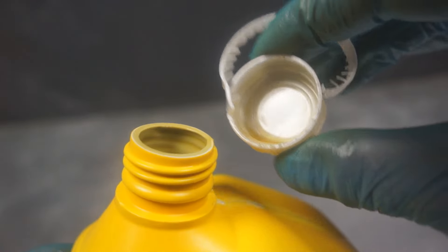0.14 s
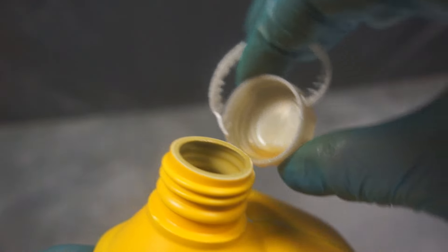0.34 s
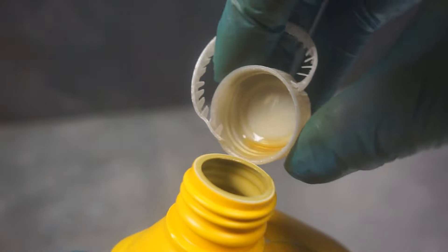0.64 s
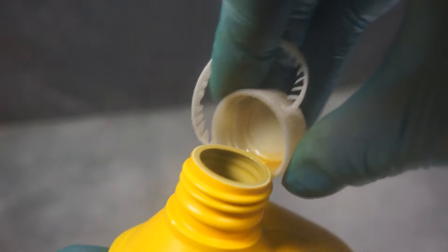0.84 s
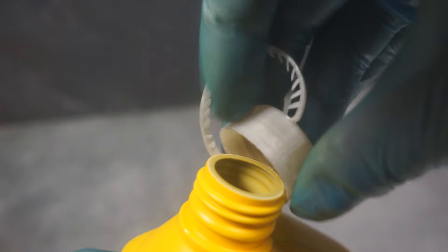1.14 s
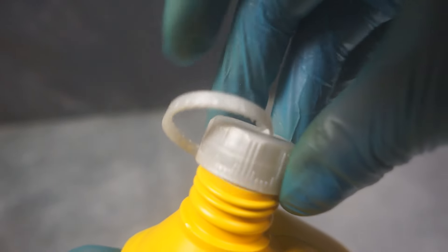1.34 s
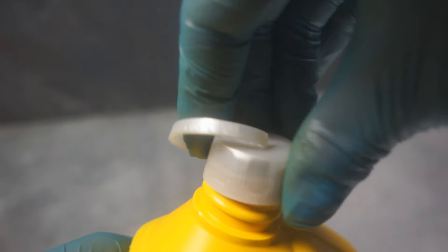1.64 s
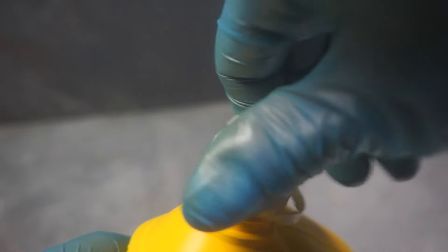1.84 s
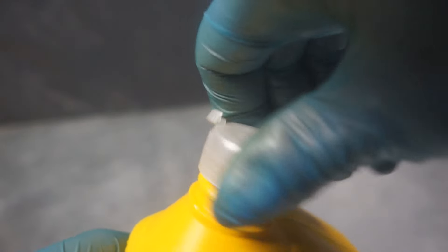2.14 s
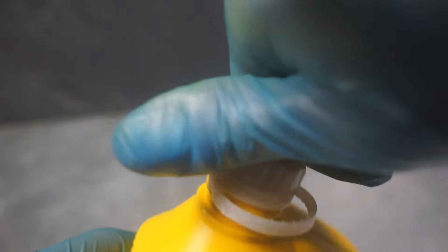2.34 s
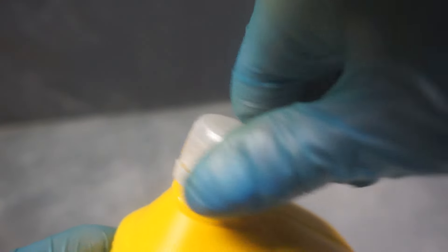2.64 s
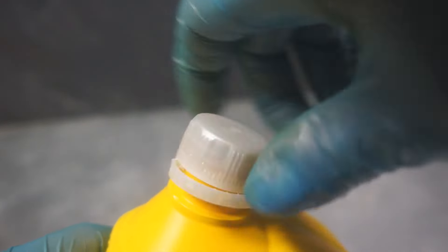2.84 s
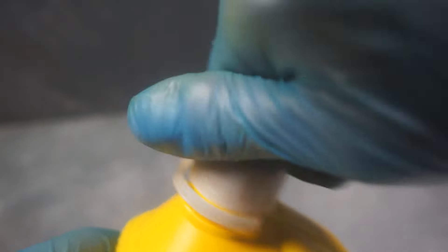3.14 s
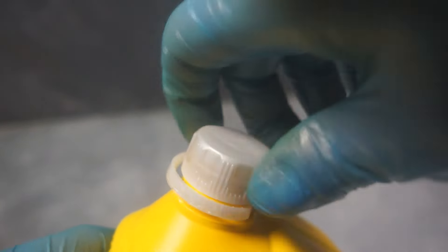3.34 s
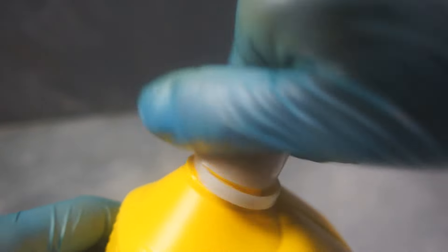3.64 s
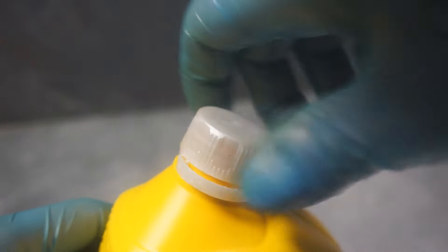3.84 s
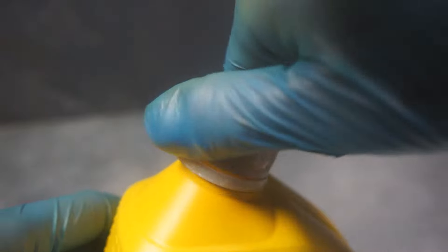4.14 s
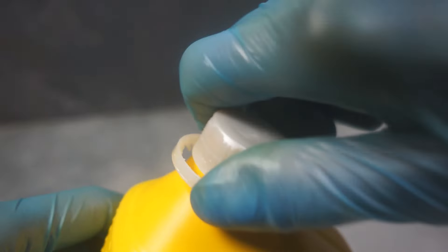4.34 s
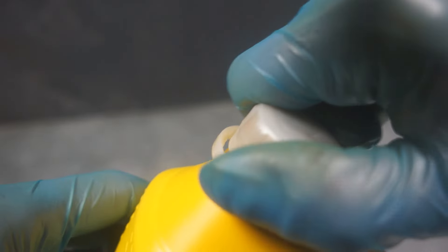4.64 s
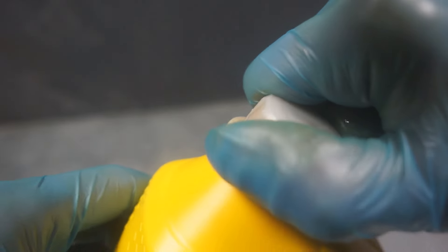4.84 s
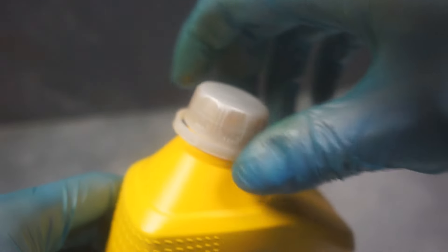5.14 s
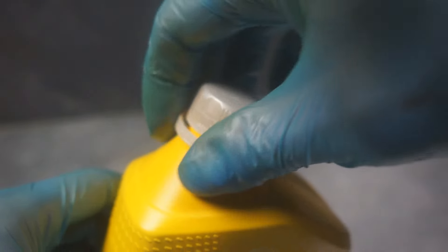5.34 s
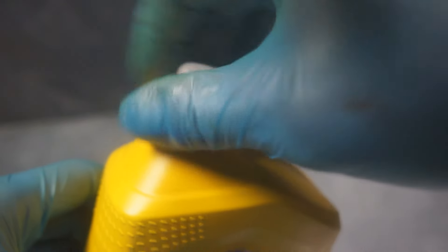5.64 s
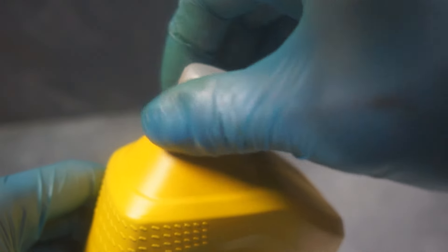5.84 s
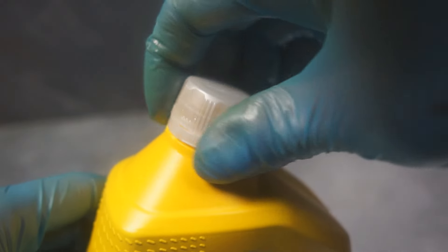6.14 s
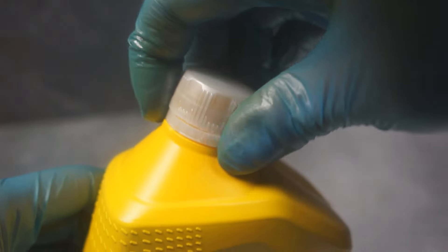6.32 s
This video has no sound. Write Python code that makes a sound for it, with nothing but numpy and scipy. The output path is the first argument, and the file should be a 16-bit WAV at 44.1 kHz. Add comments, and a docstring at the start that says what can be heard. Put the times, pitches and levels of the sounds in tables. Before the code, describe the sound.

Close, dry plastic knocks and crackling snaps as a cap is screwed onto a hollow bottle, with rubbery glove rubbing in a quiet humming room.

```python
"""A plastic screw cap knocks and snaps on a bottle neck as gloved hands twist it shut, close to two microphone ports.
Knocks: short noise blows ring decaying modes of cap, bottle and bright snap. Scrapes: stick-slip noise swells
in strokes of gloves and thread, over a lasting rub of the grip. Hands: filtered for each port, with short reflections.
Behind them: shaped room noise, a machine's faint hum of narrow noise lines and an early whir of gliding noise bands."""
import sys
import numpy as np
from scipy import signal
from scipy.fft import rfft, irfft
from scipy.io import wavfile
from scipy.ndimage import uniform_filter1d

SR = 44100
rng = np.random.default_rng(int(sys.argv[2]) if len(sys.argv) > 2 else 0)


def voltage_ratio(decibels):
    """Convert decibels (scalar or array-like) to amplitude ratios, 20 dB per decade."""
    exponent = np.asarray(decibels, float) / 20
    return 10 ** exponent


def master_out(mix):
    """Clip the mix to full scale and print it as 16-bit PCM to the path in sys.argv[1]."""
    frames = np.transpose(np.atleast_2d(mix))
    ceiling = np.clip(frames, -1, 1)
    pcm = np.round(ceiling * 32767).astype(np.int16)
    wavfile.write(sys.argv[1], SR, pcm)


N = 285768

# knocks and snaps: (time [s], cap peak [dB], bottle re cap [dB], snap re cap [dB], bottle wall tone [Hz])
KNOCKS = [(0.3747, -28.5, -8.5, -5, 2200), (0.3983, -42, 10, -21, 1050), (0.4055, -24, -21, -11, 510),
          (0.4529, -8.5, 0.5, -43, 1340), (0.549, -33, -2, -23, 1310), (0.5777, -10.5, -1.5, -34, 1364),
          (0.655, -47, 8.5, 5, 1150), (0.7627, -29, 3, -4, 1230), (0.8589, -13, 4, -22, 1210),
          (0.8947, -22.5, 6, -9, 1160), (0.8994, -17.5, 3.5, -12.5, 1160), (1.065, -41.5, 9, -16, 1220),
          (1.1049, -20, -6, 5, 1380), (1.222, -21.5, -36, 5.5, 1020), (1.2264, -2.5, -38, -5, 2000),
          (1.2299, -13.5, -24.5, 2.5, 1100), (1.2339, -18, -25, -24, 1220), (1.4697, -37, 8, 15, 477),
          (1.642, -25.5, -0.5, -4.5, 740), (1.7485, -26.5, -2, 2, 735), (1.7844, -18.5, -16, -10, 880),
          (1.793, -23, -7.5, -13, 1650), (1.8074, -19, 0.5, -24, 1110), (1.8458, -34, 4.5, 4, 740),
          (1.988, -49, 10, -10, 740), (2.174, -12, -8, -2.5, 837), (2.1999, -31, -11, -11, 783),
          (2.2223, -21, -16.5, 4, 1140), (2.2272, -4, -8.5, -0.5, 1780), (2.2299, -10.5, -3, -1, 2400),
          (2.2478, -17, -11.5, 2, 2200), (2.2886, -33, 4.5, 5, 1180), (2.511, -39, -1, 0, 1090),
          (2.5363, -32.5, -6, 9.5, 1850), (2.5676, -26, -7, -7, 1180), (2.5855, -30.5, -23, -24, 1460),
          (2.6967, -27, -28, 0, 810), (2.7736, -30.5, -2, -9, 2040), (2.814, -41, -17, 5, 865),
          (2.9662, -31, -9, 0, 660), (3.0704, -33, -25, 7, 786), (3.0991, -22, 1, -25, 850),
          (3.1308, -11, -7, -1.5, 1750), (3.189, -43, 11, -8, 724), (3.489, -24.5, -8, -9, 780),
          (3.7254, -21.5, 6, 4.5, 790), (4.0811, -26.5, -13, 5, 774), (4.1045, -23.5, -14.5, -17, 1110),
          (4.1859, -48, -6, 14, 633), (4.6459, -30, -4.5, 8.5, 1120), (4.6977, -42.5, 6.5, 8, 615),
          (4.788, -26.5, -9, -7, 296), (4.8279, -29, -7.5, -11, 1250), (4.8631, -40, 2.5, 7, 292),
          (4.9723, -35, -10.5, -20, 293), (5.022, -24.5, -19.5, -7, 630), (5.0797, -20.5, -7.5, -1, 1830),
          (5.092, -27.5, 1, -9, 1090), (5.1053, -26.5, -4.5, -3, 905), (5.1357, -23.5, -10.5, -20, 1050),
          (5.3787, -30, -22, -1, 676), (5.4995, -32, -33, -6, 657), (5.7094, -29.5, -19, 1, 528),
          (5.735, -34, -4, -17, 900), (5.7717, -5.5, -16, -7.5, 1130), (6.0777, -29, -9, -13, 310),
          (6.1508, -10.5, -8, 3.5, 1400), (6.2855, -6.5, -7, 3.5, 1090), (6.4422, -19, -8, -5, 1320),
          (6.4465, -16.5, -2, -9, 1920)]


def evened(x):
    """Scales a sound to rms 1."""
    return x / np.sqrt(np.mean(x ** 2) + 1e-20)


def read(points, hz):
    """Reads a table on a log-frequency axis."""
    f, value = np.transpose(points)
    return np.interp(np.log(hz + 1), np.log(f + 1), value)


def resonate(x, hz, width):
    """Shifts the curve hz to zero, smooths twice and shifts back: a steep resonance."""
    turn = np.exp(2j * np.pi * np.cumsum(hz * np.ones(len(x))) / SR)
    r = np.exp(-np.pi * width / SR)
    smooth = signal.lfilter([(1 - r) ** 2], [1, -2 * r, r * r], x / turn)
    return 2 * (turn * smooth).real


def room():
    """Steady air noise, only partly alike at the two ports."""
    # spectrum: (frequency [Hz], relative density [dB per Hz])
    colour = [(15, -48), (25, -38), (117, -6), (212, -8), (293, -1.5), (416, -8.5), (641, 4.5), (775, -3.5),
              (2610, -14.5), (4740, -15.5), (11000, -23.5), (14400, -20), (16000, -31)]
    # likeness of the ports: (frequency [Hz], correlation [-1..1])
    likeness = [(60, 0.71), (240, 0.22), (950, 0.31), (3770, 0.24), (15000, 0.11)]
    # balance: (frequency [Hz], left re right [dB])
    balance = [(60, -10), (180, -9.5), (550, 1), (1650, -2.5), (4970, 1), (15000, -13.5)]
    frames, hz = N // 512 + 5, np.fft.rfftfreq(2048, 1 / SR)
    a, b, c, d = rng.standard_normal((frames, 1025, 4)).T
    same = np.clip(read(likeness, hz), -1, 1)[:, None]
    left = a + 1j * b
    right = same * left + np.sqrt(1 - same ** 2) * (c + 1j * d)
    tilt_db = np.outer([.5, -.5], read(balance, hz))
    z = np.array([left, right]) * voltage_ratio(read(colour, hz) + tilt_db)[:, :, None]
    noise = signal.istft(z, nperseg=2048, noverlap=1536)[1][:, :N]
    return voltage_ratio(-56.5) * evened(noise)  # rms over both ports


def hum():
    """Wavering narrow lines of a distant machine, resonated from noise that is unlike at the two ports."""
    # fuzzy lines: (frequency [Hz], level before the swell [dB], width of one smoothing [Hz])
    hum_lines = [(266, -68, 16), (284.7, -62, 26), (313.1, -62, 2.64), (484, -68.5, 15), (579, -71, 7.2),
                 (593, -70, 9.9), (627, -66.5, 21), (686, -69.5, 8.4)]
    # swell of the whole hum: (time [s], gain [dB])
    hum_swell = [(0, -25), (.25, -3), (.4, 0.5), (2, -6), (4, -0.5), (5, 1), (6.1, 0.5), (6.48, -11)]
    noise = rng.standard_normal((2, N))
    ports = [sum(voltage_ratio(db) * evened(resonate(n, hz, w)) for hz, db, w in hum_lines) for n in noise]
    return np.array(ports) * voltage_ratio(np.interp(np.arange(N) / SR, *np.transpose(hum_swell)))


def whir():
    """Noise in two narrow bands whose tones glide and step, stronger on the right."""
    # two strands: (time [s], frequency [Hz], level before panning [dB])
    strands = [
        [(0, 620, -54.5), (.14, 634, -55), (.17, 750, -56), (.24, 745, -61), (.265, 843, -58), (.35, 877, -56),
         (.38, 870, -71)],
        [(0, 1227, -67), (.17, 1258, -65), (.19, 960, -60), (.24, 983, -55), (.3, 970, -54), (.34, 970, -59),
         (.38, 960, -75)],
    ]
    t, out = np.arange(N) / SR, np.zeros(N)
    for s, hz, db in np.transpose(strands, (0, 2, 1)):
        tone = evened(resonate(rng.standard_normal(N), np.interp(t, s, hz), 64))
        out += tone * voltage_ratio(np.interp(t, s, db)) * (t < s[-1])
    return out * voltage_ratio([[-1.5], [1.5]])


def near(x):
    """Two close ports hear the hands with their own balance and phase, plus short reflections."""
    # balance: (frequency [Hz], left re right [dB])
    port_balance = [(300, -1), (1000, -1.5), (2400, 3.5), (5000, 3), (9000, 2), (14000, -4.5)]
    # phase: (frequency [Hz], lead of the left port [rad])
    port_lead = [(300, 0.24), (600, 0.2), (2150, 0.22), (2760, 0.7), (9000, -0.47), (11700, -0.49)]
    x = signal.sosfilt(signal.butter(4, 220, "highpass", fs=SR, output="sos"), x)  # small things give no bass
    hz = np.fft.rfftfreq(N, 1 / SR)
    tilt = voltage_ratio(read(port_balance, hz) / 2) * np.exp(.5j * read(port_lead, hz))
    direct = irfft(rfft(x) * np.array([tilt, 1 / tilt]), N)
    t = np.arange(8000) / SR
    tail = rng.standard_normal((2, len(t))) * voltage_ratio(-60 * t / 0.027) * (t > .002)  # t60 27 ms, from 2 ms on
    tail /= np.linalg.norm(tail[0])
    return direct + voltage_ratio(-10.5) * signal.fftconvolve(x[None], tail, axes=1)[:, :N]


def rubbing():
    """Friction noise: stick-slip grains and sparse thread ticks on hiss, in uneven clumps; rms 1."""
    slips_per_s, ticks_per_s, tick_db = 700, 74, 18
    slips = voltage_ratio(1.8 * np.minimum(rng.exponential(1, N), 5)) * (rng.random(N) < slips_per_s / SR)
    rub = rng.standard_normal(N) * (1 + 2.3 * uniform_filter1d(slips, size=6))
    clumps = evened(uniform_filter1d(uniform_filter1d(rng.standard_normal(N), 250), 250))
    rub = rub + voltage_ratio(tick_db) * rng.standard_normal(N) * (rng.random(N) < ticks_per_s / SR)
    return evened(rub * voltage_ratio(1.4 * clumps))


def stroke_rows():
    """Scraping strokes, plus a rattle for every knock, which shakes cap and ring for a moment."""
    # strokes: (time of the height [s], build-up [ms], cap [dB], bottle re cap [dB], glove hiss re cap [dB])
    stroke_table = [(0.545, 90, -54.5, 1.5, -5), (1.005, 110, -57.5, 2, -15), (1.095, 57, -51.5, -15, -5.5),
                    (1.168, 38, -50.5, -11, -2), (1.192, 26.3, -41, -7.5, 5), (1.258, 57, -39, -20, -3),
                    (1.3, 45, -50, -12, -8), (1.425, 38, -52.5, -4.5, 5), (1.477, 53, -45, -10.5, 1),
                    (1.639, 34, -54, 7.5, -4), (1.76, 54, -45.5, -11, -1.5), (1.796, 10.2, -30, -1, -5.5),
                    (1.836, 39, -44.5, -1.5, 0), (2.045, 36, -50, 1.5, -1), (2.301, 113, -50.5, 1, 0),
                    (2.59, 160, -63, 3.5, -18), (2.718, 73, -44.5, -5.5, -4.5), (2.816, 12, -51, -4, 11.5),
                    (2.848, 34, -45, -4, 1.5), (3.07, 52, -49.5, -25, -6), (3.153, 110, -45.5, 1.5, -0.5),
                    (3.32, 67, -57, 1, 6), (3.416, 17, -52, -3, -1.5), (3.501, 11.5, -39, 1, -2),
                    (3.53, 35, -46, -2.5, -3), (3.653, 113, -48.5, -3.5, 1.5), (3.83, 150, -54, 0.5, 5),
                    (4.124, 53, -40.5, -1.5, -1.5), (4.276, 49, -43.5, -9.5, 0), (4.351, 18, -57, 1, 4.5),
                    (5.06, 77, -46, -7, -3), (5.108, 62, -42, -8, 0.5), (5.305, 47, -56, -1.5, -2.5),
                    (5.417, 49, -49, -3, -0.5), (5.504, 55, -46, -10, -3), (5.659, 38, -53, -5, 0),
                    (5.714, 23, -45.5, -26, 0), (5.802, 68, -43.5, -4, -2), (5.905, 89, -49.5, -5.5, 2),
                    (5.989, 52, -51.5, -6.5, -3.5), (6.14, 66, -49.5, -9, -3.5), (6.437, 34, -46.5, -9, 1)]
    stop_share = 0.43  # a stroke stops in this share of its build-up time
    rise_ms, fall_ms, rattle_db = 8.4, 28.6, -38.5  # rattle, level re its knock
    rows = [(s, ms, stop_share * ms, *levels) for s, ms, *levels in stroke_table]
    for s, db, bottle_db, snap_db, _ in KNOCKS:
        # the rattle takes on a little of its knock's colour
        rows.append((s, rise_ms, fall_ms, db + rattle_db, -1 + 0.13 * bottle_db, -2 + 0.13 * snap_db))
    return rows


def strokes():
    """Rubbing coloured by cap and bottle swells as the hand speeds up and stops, over the resting grip."""
    # colour, with the cap's hollow near 4.8 and 10 kHz: (frequency [Hz], relative density [dB per Hz])
    scrape_colour = [(220, -12), (350, -11), (650, -9), (1150, -7), (2400, -13.5), (3400, -7), (4200, -5.5),
                     (4900, -4), (5800, -6.5), (7600, -8.5), (10200, -10.5), (12000, -13), (14200, -23.5),
                     (15800, -35.5), (16600, -55)]
    # gloves resting and shifting on the plastic: (time [s], cap level [dB])
    grip = [(0, -75), (.4, -67), (.8, -68), (.93, -63), (1.35, -65), (1.9, -61.5), (2.12, -74), (2.39, -64),
            (2.5, -56), (2.96, -59.5), (3.8, -70), (3.925, -63), (3.98, -50.5), (4.07, -52.5), (4.4, -60.5),
            (4.6, -56.5), (4.9, -66.5), (5.2, -64), (5.36, -65), (5.58, -55), (6.04, -66), (6.24, -52.5),
            (6.37, -60.5)]
    hz, _, z = signal.stft(rubbing(), SR, nperseg=256)
    patches = evened(uniform_filter1d(uniform_filter1d(rng.standard_normal(z.shape), 5, 0), 40, 1))
    z *= voltage_ratio(read(scrape_colour, hz)[:, None] + 2.2 * patches)
    s, rise_ms, fall_ms, cap_db, bottle_db, hiss_db = np.transpose(stroke_rows())[:, :, None]
    t = np.arange(0, N, 32) / SR
    late_ms = 1000 * (t - s)
    flank_ms = np.where(late_ms < 0, rise_ms, fall_ms)
    swell = np.exp(-abs(late_ms / flank_ms) ** 2.55)
    grip_db, out = np.interp(t, *np.transpose(grip)), np.zeros(N)
    # cap, bottle, hiss: (stroke re cap [dB], grip re cap [dB], lowest and highest frequency [Hz])
    parts = [(0, 0, 3000, 6500), (bottle_db, -4.5, 0, 3000), (hiss_db, -1, 6500, SR)]
    for db, rest_db, low, high in parts:
        part = signal.istft(z * ((hz >= low) & (hz < high))[:, None], SR, nperseg=256)[1][:N]
        moving = np.linalg.norm(swell * voltage_ratio(cap_db + db), axis=0)
        level = np.hypot(moving, voltage_ratio(grip_db + rest_db))
        out += evened(part) * np.interp(np.arange(N) / SR, t, level)
    return out


def gripped(modes, hz, db, t60, slope_db):
    """The grip leaves one tone free; modes lose slope_db per octave away from it."""
    damped = [(f, level - slope_db * abs(np.log2(f / hz)), ring_s) for f, level, ring_s in modes]
    return [(hz, db, t60)] + damped


def ring(modes, blow, chance, band_hz):
    """A short blow through dying modes within a band; where it lands sets each mode's share. Peak 1."""
    t = np.arange(3000) / SR
    sound = np.zeros(len(t))
    for (hz, db, t60), (share, detune) in zip(modes, chance):
        sound += voltage_ratio(db + 3.5 * share - 60 * t / t60) * np.sin(2 * np.pi * hz * (1 + .03 * detune) * t)
    band = signal.butter(4, band_hz, "bandpass", fs=SR, output="sos")
    sound = signal.sosfilt(band, signal.fftconvolve(sound, blow)[:len(t)])
    return sound / abs(sound).max()


def clicks():
    """Each knock rings the cap, its air hollow, the bottle wall and a bright snap."""
    # ringing of the plastic, before grip and chance: (frequency [Hz], relative level [dB], t60 [s])
    bottle_modes = [(760, -14, 0.096), (1310, 3, 0.017), (1750, 8.5, 0.0097), (2040, 5.5, 0.018),
                    (2490, 1, 0.017), (2800, -24, 0.0032)]
    cap_modes = [(3450, -8, .007), (4000, -7, .008), (4400, -5, .01), (4800, -4, .008), (5250, -4, .007),
                 (6000, -5, .006)]
    snap_modes = [(6470, 22.5, 0.0023), (7400, 11.5, 0.0052), (8810, 19, 0.0037), (9150, 6, 0.012),
                  (10200, 3, 0.021), (11150, 13, 0.0026), (13400, -40, .003)]
    # free tone of the cap's hollow, shifting as the fingers cover it: (time [s], frequency [Hz])
    hollow = [(0, 4720), (1.12, 4550), (1.22, 5120), (1.3, 4900), (1.8, 4400), (2.18, 4730), (2.227, 5970),
              (2.25, 3570), (2.72, 4000), (3.13, 4300), (3.49, 5600), (3.73, 4600), (4.75, 5900),
              (5.1, 4620), (5.85, 4350), (6.15, 5840), (6.3, 5050)]
    # air in the open neck (frequency [Hz], level [dB], t60 [s]), silent once the cap sits on it
    neck, seated_s = (538, -7.5, 0.075), 1.3
    out, t = np.zeros(N + 3000), np.arange(400) / SR
    draws = rng.standard_normal((len(KNOCKS), 444))
    for (s, db, bottle_db, snap_db, wall_hz), draw in zip(KNOCKS, draws):
        cap_hz = np.interp(s, *np.transpose(hollow))
        # knocks on the wall are brief, thread snaps chatter
        contact_s = np.interp(bottle_db, [-20, 0], [.0009, .0003])
        blow = draw[:400] * (t / contact_s) ** 1.77 * np.exp(-t / contact_s)
        blow[round(contact_s * SR)] += 3.5  # the one hard slip within the chatter
        push = signal.windows.hann(14) * (1 + 0.9 * draw[:14])  # the wall feels a softer push
        chance = draw[400:].reshape(22, 2)
        chance[[0, 7]] = 0  # the free tones are set by the grip
        cap_body = gripped(cap_modes, cap_hz, 2.5, 0.012, 2.2)
        cap = ring(cap_body, blow, chance[:7], (min(0.7 * cap_hz, 4200), 1.303 * cap_hz))
        wall_body = gripped(bottle_modes, wall_hz, 3.2, 0.021, 5.44)
        lowest_hz = 800
        if s < seated_s:
            wall_body.append(neck)
            lowest_hz = 450
        wall = ring(wall_body, push, chance[7:15], (min(0.56 * wall_hz, lowest_hz), 3500))
        snap = ring(snap_modes, blow, chance[15:], (6400, 15000))
        at = round(s * SR)
        out[at:at + 3000] += voltage_ratio(db) * (cap + voltage_ratio(bottle_db) * wall + voltage_ratio(snap_db) * snap)
    return out[:N]


def scene():
    """Hands close by, room, hum and whir behind."""
    return near(clicks() + strokes()) + room() + hum() + whir()


def band_limit(x):
    """A steep low-pass at the top of the band."""
    return signal.sosfilt(signal.butter(12, 16640, fs=SR, output="sos"), x)


def record(dry):
    """Clips the loudest peaks flat just below full scale."""
    capped = np.clip(dry, -.95, .95)
    return band_limit(capped)


dry = scene()
out = record(dry)
master_out(out)
```